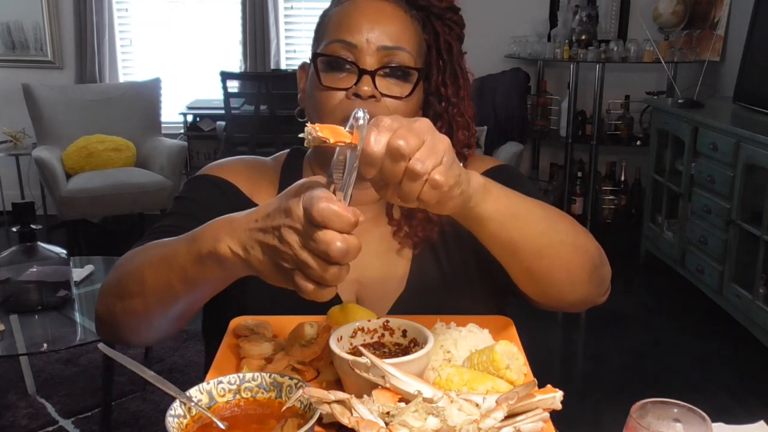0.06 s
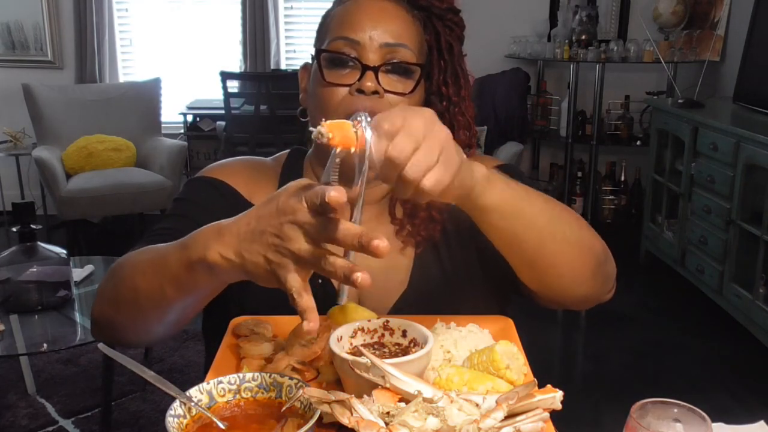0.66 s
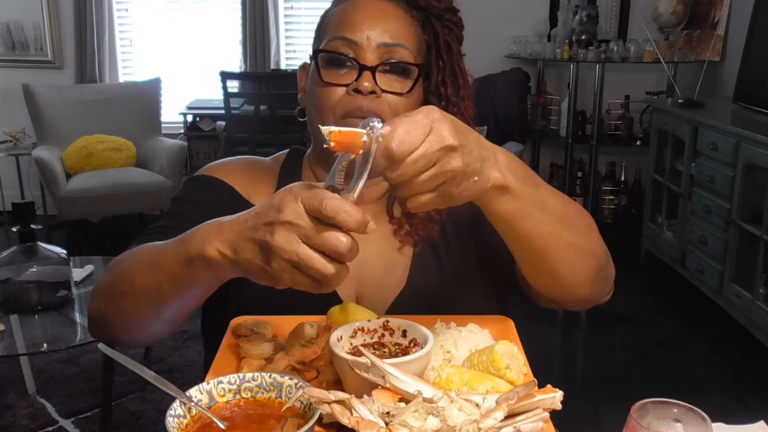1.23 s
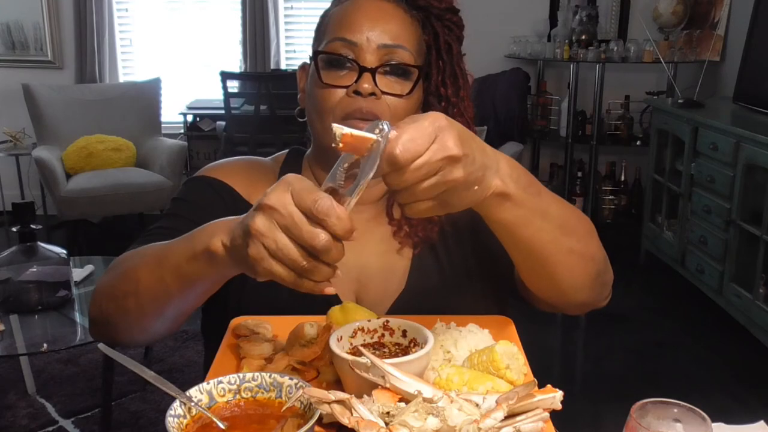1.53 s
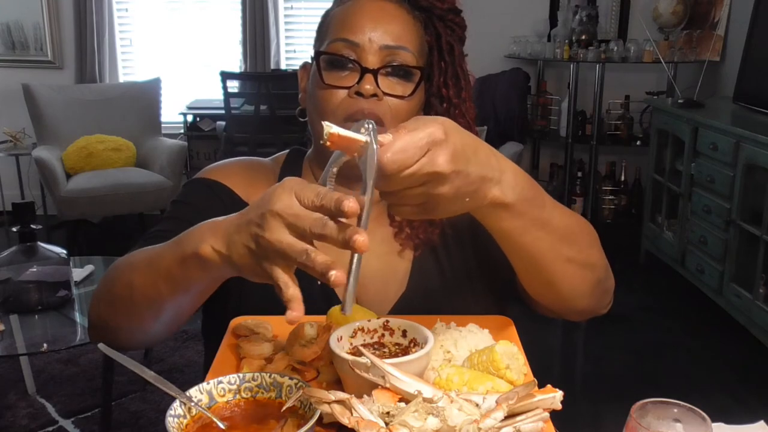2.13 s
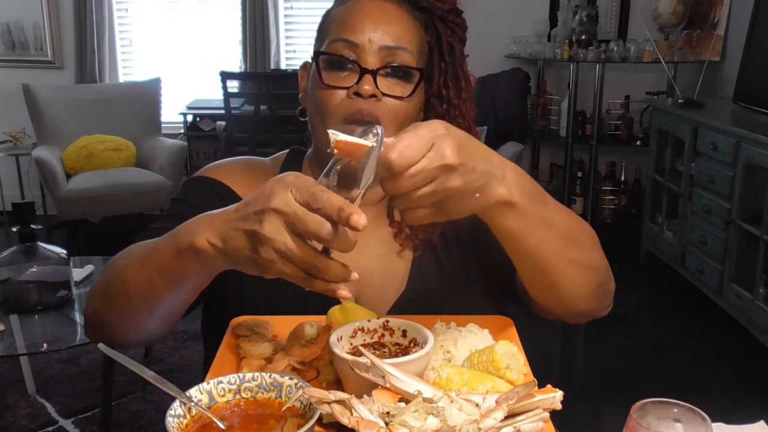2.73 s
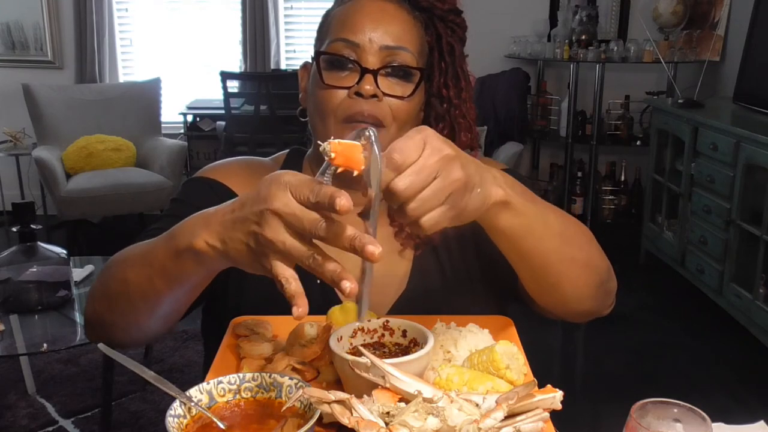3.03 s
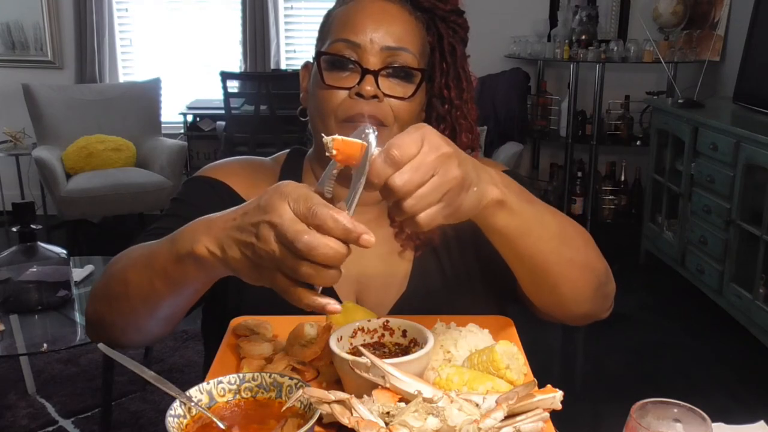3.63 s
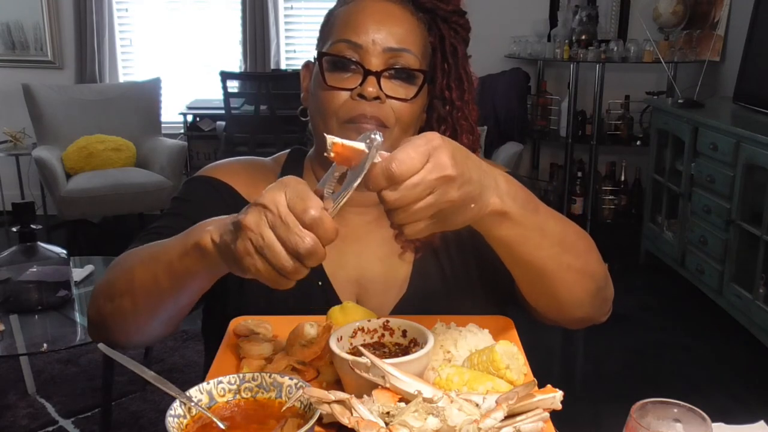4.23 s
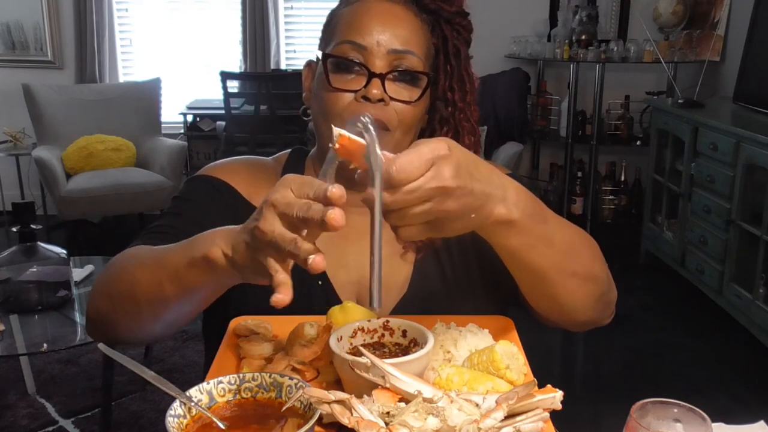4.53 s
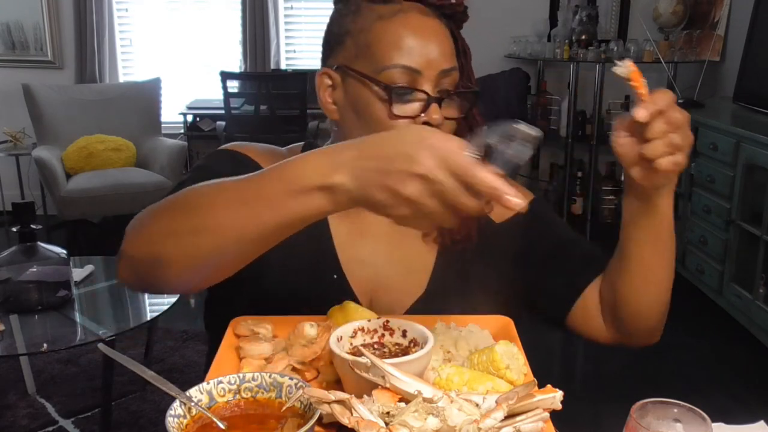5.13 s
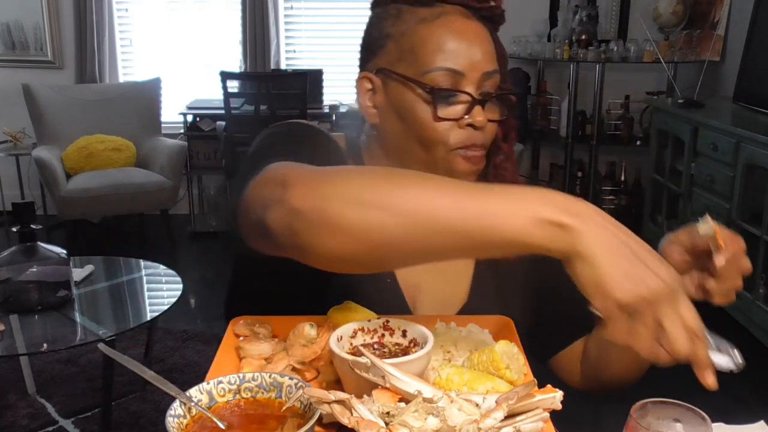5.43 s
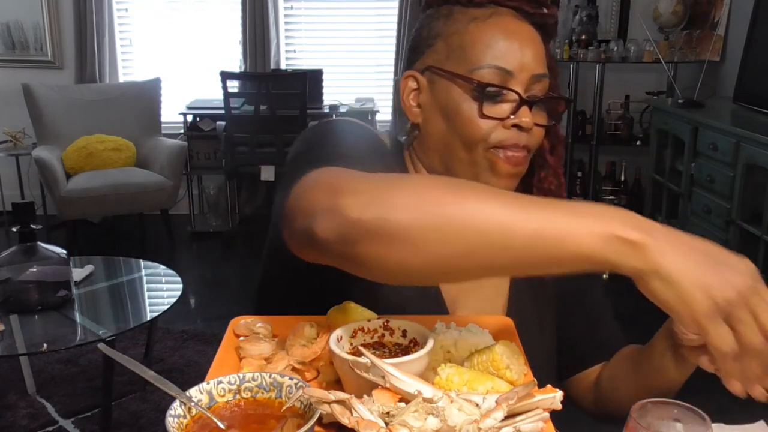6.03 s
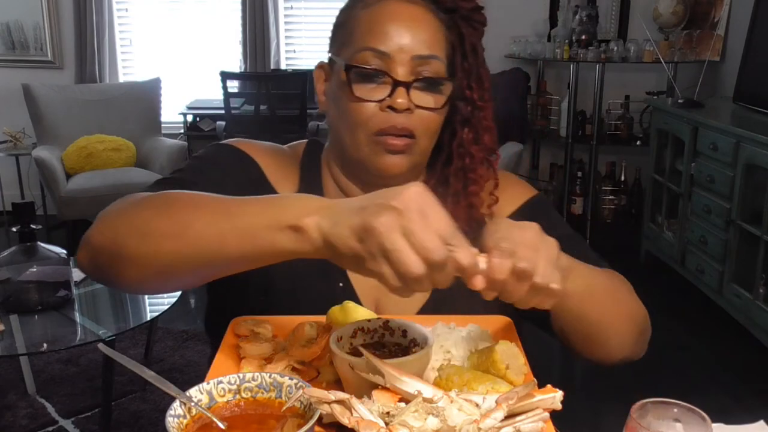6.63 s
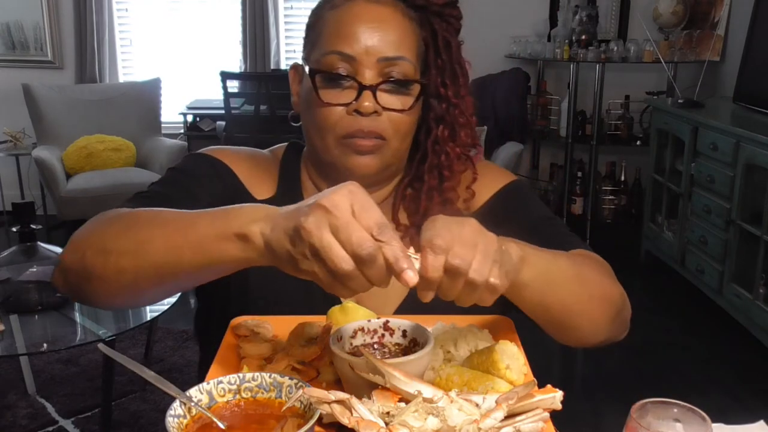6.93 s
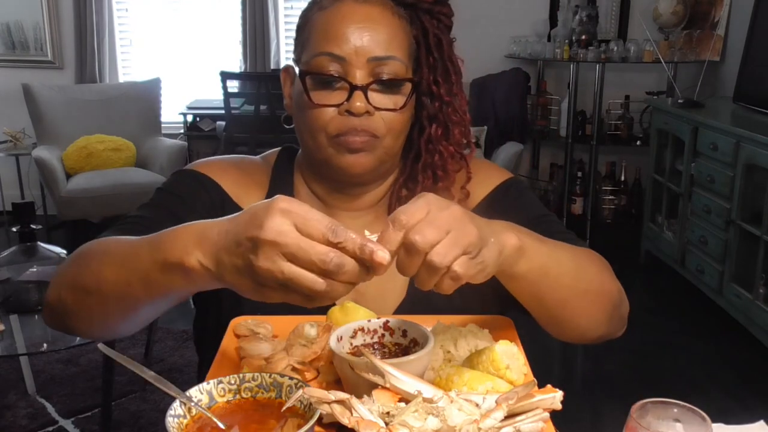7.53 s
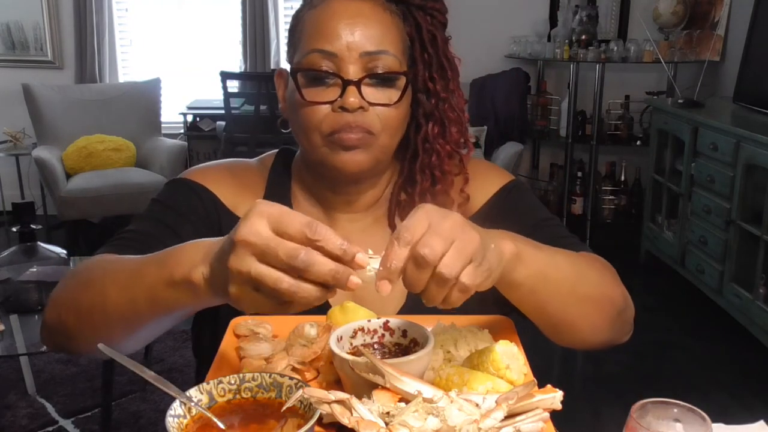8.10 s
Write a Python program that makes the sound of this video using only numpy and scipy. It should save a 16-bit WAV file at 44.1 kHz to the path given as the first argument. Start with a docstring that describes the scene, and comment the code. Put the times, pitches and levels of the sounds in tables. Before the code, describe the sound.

Crab shell breaks in a metal cracker close to the microphone, opening with a quick burst of sharp, bright snaps. Faint rasps, ticks and dull slips follow as the hollow leg shifts in the jaws, with another sharp snap at about 1.6 seconds and a smaller one near 2.2. Around 4 seconds comes a dense, loud run of cracks, trailing into soft rubbing and clicks. Near 6 seconds the cracker is put down slightly to the right with a clack and a brief ringing clatter. Fingers break the shell with a loud snap at 6.8 seconds and more cracks around 7.3. Just after 8 seconds the meat comes loose with a tiny soft plop. A faint motor hum and dull rush of room air continue throughout, dipping briefly after loud cracks. The living room adds a short echo.

```python
"""Sharp snaps and crackles come first: a crab leg is squeezed in a metal cracker over a food tray.
The hollow shell rubs, slips and breaks, close by in a living room. Near 6 s the cracker is put down
with a ringing clatter. Fingers then break the shell further, and the meat comes loose with a soft plop.
A motor hums faintly throughout, and an automatic gain control dips the level after each loud crack."""
import sys
import numpy as np
from scipy import signal
from scipy.fft import rfft, irfft
from scipy.io import wavfile
from scipy.ndimage import uniform_filter1d

SR = 44100
rng = np.random.default_rng(int(sys.argv[2]) if len(sys.argv) > 2 else 0)


def waveform_to_disk(signal):
    """Save audio, clipped to [-1, 1], as 16-bit WAV at the path in sys.argv[1]."""
    frames = np.transpose(np.atleast_2d(signal))
    scaled = np.clip(frames, -1, 1) * 32767
    samples = np.round(scaled).astype(np.int16)
    wavfile.write(sys.argv[1], SR, samples)


N = 364266


def from_db(db):
    """Turn decibels into a number to multiply a sound by."""
    return 10 ** (np.asarray(db) / 20)


def rms_one(x):
    """Scale a sound to an average power of one."""
    return x / np.sqrt(np.mean(x ** 2) + 1e-20)


def unit_energy(x):
    """Scale each channel to a total energy of one."""
    return x / np.sqrt(np.sum(x ** 2, axis=-1, keepdims=True) + 1e-20)


def band(x, low_hz, high_hz, order=2):
    """Keep the part of a sound between two pitches."""
    sos = signal.butter(order, [low_hz, min(high_hz, .48 * SR)], "band", fs=SR, output="sos")
    return signal.sosfilt(sos, x)


def at_hz(points, hz, column=1):
    """Read a table at any pitch, sliding between its rows."""
    points = np.array(points)
    return np.interp(np.log(hz + 1e-9), np.log(points[:, 0]), points[:, column])


def add(out, start_s, sound):
    """Mix a short sound in at the given time."""
    start = max(0, round(start_s * SR))
    out[:, start:start + sound.shape[1]] += sound[:, :N - start]


def stereo_noise(size, side_db):
    """Hiss for two ears; side_db sets how much left and right differ."""
    mid, side = rng.standard_normal((2, size))
    return mid + from_db(side_db) * side * np.array([[1], [-1]])


def ticks(size, per_s, spread_db):
    """Tiny contacts at random moments, of uneven strength."""
    chance, sign = rng.random((2, size))
    strength = from_db(spread_db * np.minimum(rng.exponential(1, size), 3))
    return (chance < per_s / SR) * np.sign(sign - .5) * strength


def click_with(spectrum, size=2048):
    """The shortest click with the tone given by rows of pitch_hz, level_db."""
    hz = np.arange(size // 2 + 1) * SR / size
    cepstrum = irfft(np.log(from_db(at_hz(spectrum, hz))))
    cepstrum[1:size // 2] *= 2  # this line and the next pack the energy at the start
    cepstrum[size // 2 + 1:] = 0
    return irfft(np.exp(rfft(cepstrum)))


def fracture(click, tear_ms, side_db=-11):
    """Spread a click into a sudden break and a dying run of tiny cracks."""
    ms = 1e3 * np.arange(1024) / SR
    tear = unit_energy(stereo_noise(len(ms), side_db) * np.exp(-ms / tear_ms))
    tear[:, 0] += .61 * np.exp(-2 * tear_ms)  # the quicker the break, the harder its first spike
    return np.linalg.norm(click) * unit_energy(signal.fftconvolve(tear, click[None], axes=1))


def struck(tones, scatter_db, phase_spread):
    """A blow starts tones, out of step in each ear; each fades by 60 dB in its ring_s."""
    t = np.arange(SR // 5) / SR
    out = np.zeros((2, len(t)))
    for hz, db, ring_s in tones:
        phase = np.pi * rng.integers(0, 2) + phase_spread * rng.standard_normal((2, 1))
        fade = from_db(db + scatter_db * rng.standard_normal() - 60 * t / ring_s)
        out += fade * np.sin(2 * np.pi * hz * t + phase)
    return out


def room_air(level_db=-53.5):
    """The air in the room makes a dull, steady rush."""
    # tone of the rush: pitch_hz, relative_db, side_db
    air_tone = [(25, -27, -12.5), (60, -12, -11), (98.2, -8, -4.5), (139.2, -0.5, -8.5), (338, 5, -12.5),
                (510, -2, -6.5), (910, -11.5, -5), (1260, -15, -1), (1630, -25.5, -2), (3266, -31, -1),
                (6220, -33.5, -1), (8000, -29.5, -1), (12250, -29.5, 1), (16000, -36, 1.5)]
    hz = np.arange(N // 2 + 1) * SR / N
    mid, side = rfft(rng.standard_normal((2, N))) * from_db(at_hz(air_tone, hz))
    side *= from_db(at_hz(air_tone, hz, column=2))
    return from_db(level_db) * rms_one(irfft(mid + side * np.array([[1], [-1]]), N))


def motor_hum(drift=.003):
    """A motor hums; its tones drift together as its speed wanders."""
    # tones of the motor: pitch_hz, level_db
    hum_tones = [(118.8, -58.5), (178.2, -66.5), (237.6, -73.5), (297, -62.5), (415.8, -80), (594, -71.5),
                 (653.4, -68.5), (712.8, -85.5), (891, -76)]
    speed = 1 + drift * np.interp(np.arange(N) / SR, np.arange(10), rng.standard_normal(10))
    motor_s = np.cumsum(speed) / SR
    return sum(from_db(db) * np.sqrt(2) * np.sin(2 * np.pi * (hz * motor_s + rng.random()))
               for hz, db in hum_tones)


def room_echo(x, build_s=.0012):
    """The room's echo builds quickly, then dies at its own rate in each pitch range."""
    # the echo: pitch_hz, level_db, ring_s (time to fade by 60 dB), side_db
    echo_bands = [(146.7, 0, 0.3, -3.5), (900, -2.5, 0.85, -4.5), (1484, -1, 0.52, -5.5),
                  (2480, -1.5, 0.47, -5.5), (4470, -2, 0.5, -4), (8300, -4.5, 0.48, -1.5),
                  (10800, -8.5, 0.42, 2), (15060, -3.5, 0.3, -0.5)]
    t, edges = np.arange(SR) / SR, np.geomspace(100, 18000, 14)
    response = 0
    for low, high in zip(edges, edges[1:]):
        hz = np.sqrt(low * high)
        level_db, ring_s, side_db = (at_hz(echo_bands, hz, column) for column in (1, 2, 3))
        envelope = from_db(-60 * t / ring_s) * (1 - np.exp(-t / build_s))
        tail = unit_energy(band(stereo_noise(len(t), side_db), low, high, order=3) * envelope)
        response += from_db(level_db) * np.sqrt(2 * (high - low) / SR) * tail
    return signal.fftconvolve(x.mean(axis=0, keepdims=True), response, axes=1)[:, :N]


def meat_plops():
    """Small wet pockets pop open and ring briefly as the meat comes loose."""
    # the plops: start_s, pitch_hz, level_db, ring_s
    plops = [(8.1397, 1133, -45.5, 0.042), (8.143, 840, -45.5, 0.047)]
    out = np.zeros((2, N))
    for start_s, hz, db, ring_s in plops:
        add(out, start_s, struck([(hz, db, ring_s)], scatter_db=4, phase_spread=.23))
    return out


def shell_rubbing(attack_s=.0064, release_s=.0057, width_hz=1400):
    """Rough shell slides under pressure: tiny slips rasp in the hollow leg, with bright ticks on top."""
    # squeezes and twists: start_s, length_s, relative_db, rasp_hz, ticks_db (compared with the rasp)
    squeezes = [(0, 0.0022, -34, 3950, 8), (0.057, .034, -40, 4140, 7), (.431, 0.042, -57, 3700, -1.5),
                (.54, 0.036, -58.5, 4070, -2), (0.687, 0.067, -61, 3670, -3), (1.492, .057, -62.5, 4160, 0),
                (2.003, 0.042, -72, 3500, 3), (2.502, 0.05, -64, 3900, -5.5), (2.748, .05, -69, 3630, -1),
                (3.182, .017, -52, 3800, -7), (3.492, 0.083, -63, 3500, -8), (4.165, .04, -59, 4400, -3),
                (4.447, 0.024, -50.5, 4200, 0), (4.612, 0.1, -53, 4100, -9), (4.767, 0.018, -54, 3830, 1.5),
                (5.5, .037, -65, 3200, -3), (6.481, 0.085, -72, 3390, -10), (7.267, 0.043, -60, 3180, 0),
                (7.504, 0.044, -63, 4000, -6), (7.875, .097, -80, 3700, -3)]
    out, t = np.zeros((2, N)), np.arange(SR // 4) / SR
    for start_s, length_s, db, rasp_hz, ticks_db in squeezes:
        pressure = np.clip(t / attack_s, 0, 1) * np.exp(-np.maximum(t - length_s, 0) / release_s)
        grit = ticks(len(t), per_s=760, spread_db=-.5) * stereo_noise(len(t), side_db=-5.5)
        rasp = rms_one(band(grit, rasp_hz - width_hz / 2, rasp_hz + width_hz / 2))
        grains = rms_one(band(ticks(len(t), per_s=350, spread_db=1), 5700, 11000))
        add(out, start_s, from_db(db - 6) * pressure * (rasp + from_db(ticks_db) * grains))
    return out


def shell_click(bass_db, body_db, body_hz, wall_db, tilt_db, chip_hz):
    """One break: the hollow leg rings from body_hz up, its stiff wall higher, the loose chip highest."""
    low_db = 5.5 - 10 * np.log10(1 + from_db(tilt_db) ** 2)
    high_db = low_db + tilt_db  # tilt_db leans the treble toward its high end
    knock = [(40, bass_db + .5), (120, bass_db + 9), (300, bass_db + 16),
             (700, bass_db + 7.5), (1200, bass_db + 10.5), (1700, bass_db + 4.5)]
    body = [(.82 * body_hz, min(bass_db + 12, body_db - 2.5)), (body_hz, body_db),
            (4250, (body_db + wall_db) / 2)]
    wall = [(4800, wall_db), (5400, wall_db - 3), (6200, min(wall_db, low_db - 7.5))]
    treble = [(7700, low_db - .23 * tilt_db), (9500, low_db + .5 * tilt_db + .29), (11000, high_db - .3),
              (13000, high_db - 5), (14500, high_db - 8.5), (15500, high_db - 17.5)]
    click = click_with(sorted(knock + body + wall + treble))
    chip_ring = band(click, chip_hz - 500, chip_hz + 500, order=1)
    return click + from_db(-4) * chip_ring


def shell_crumbs(crumbs_per_s=9.3, crumb_db=-46):
    """Small bright chips flake off, each with its own tone; finer crumbs fall at random."""
    # chips under the fingers: start_s, relative_db
    chips = [(.61, -36.5), (1.392, -40), (1.511, -26.5), (1.534, -33), (1.564, -34), (1.986, -39),
             (2.029, -40), (2.045, -38), (2.13, -36.5), (2.369, -38), (2.773, -36), (2.849, -36.5),
             (2.965, -38.5), (4.731, -32), (4.997, -38), (5.281, -37), (6.721, -27), (7.007, -28),
             (7.196, -41), (7.296, -23), (7.81, -46.5), (7.905, -40), (8.24, -42)]
    out = np.zeros((2, N))
    draws = rng.random((int(crumbs_per_s * N / SR), 2))
    crumbs = [(when * (N - 1) / SR, crumb_db + size - .5) for when, size in draws]
    for start_s, db in chips + crumbs:
        click = shell_click(bass_db=-14.5, body_db=-8, body_hz=3100, wall_db=-8.5,
                            tilt_db=rng.normal(0, 3), chip_hz=rng.uniform(7500, 12000))
        add(out, start_s, from_db(db) * fracture(click, tear_ms=.9))
    return out


def hinge_rattle(fade_s=.0062):
    """The hinge and toothed jaws chatter after a blow, metal on metal."""
    # tone of the chatter: pitch_hz, relative_db
    rattle_tone = [(100, -29), (1500, -24), (2200, -17), (2900, -26.5), (4400, -13.5), (5300, -14),
                   (6100, -4.5), (7300, 0.5), (8100, -3.5), (9500, 2), (10900, 0), (12000, -10.5),
                   (14500, -10.5), (16000, -23.5)]
    t = np.arange(SR // 5) / SR
    contacts = ticks(len(t), per_s=900, spread_db=.5) * np.exp(-t / fade_s)
    chatter = contacts * stereo_noise(len(t), side_db=-14.5)
    return unit_energy(signal.fftconvolve(chatter, click_with(rattle_tone)[None], axes=1))


def cracker_landing(split_hz=63.5):
    """The cracker lands, tips and settles: it clacks, its arms ring and the table thuds."""
    # blows, with relative levels: start_s, ring_db, slope_db_per_octave, thud_db, clack_db
    landings = [(5.9006, -15, 0, -28.5, 3.5), (5.9193, -25.5, 5, -40.5, -10), (5.9553, -36, 0, -39, -16),
                (5.969, -16.5, -1, -55.5, 20), (6.0803, -29, -3.5, -52, -19),
                (6.0833, -24.5, 4, -47.5, -19)]
    # tones of the metal arms: pitch_hz, relative_db, ring_s
    arm_tones = [(4450, -18, .07), (5750, -14.5, 0.11), (6115, -12.5, .22), (7047, -5.5, 0.18),
                 (7413, -7, .17), (7600, -14, .08), (8651, 0, .11), (8893, -8, .1), (9415, -9, .13),
                 (9600, -8, 0.14), (9781, -7.5, .18), (9880, -7.5, 0.11), (10400, 2.5, .14),
                 (10750, -4.5, .14), (10920, -4.5, .14), (11080, -21, .12), (11750, -13, .1),
                 (12380, -17.5, .1), (13420, -10.5, .15), (14560, -13, .14)]
    # tones of the table and its dishes: pitch_hz, relative_db, ring_s
    table_tones = [(140, -6.5, 0.092), (200, -4.5, .072), (268, 4.5, .06), (315, -8.5, .08),
                   (373, 1.5, .12), (500, -4.5, .078), (560, -7.5, .1), (655, 0.5, .13), (776, 2, .11),
                   (860, -4.5, 0.12), (958, 0, .12), (1050, -8.5, 0.095), (1110, -6, .12), (1270, -10, .1),
                   (1375, -6.5, .08), (1637, -23, .1), (2110, -15.5, .1), (2347, -14, .08),
                   (3252, -18.5, 0.09), (3350, -5.5, 0.11), (3460, -5.5, 0.12), (3610, -5.5, 0.099),
                   (3747, -9, .09)]
    # the clack of metal on the table: pitch_hz, relative_db
    clack_tone = [(60, -15), (200, -8), (700, -8), (1300, -15), (2200, -10), (3500, -29.5), (4700, -3.5),
                  (6000, -13), (7200, 8), (9000, -2), (11000, 0), (13000, -19), (15500, -24)]
    knock_tone = [(885, 18.5, .007)]  # the table top gives under the blow
    clack, metal, thud = np.zeros((3, 2, N))
    t = np.arange(SR // 4) / SR
    for start_s, ring_db, slope_db, thud_db, clack_db in landings:
        arms = [(hz, db + slope_db * np.log2(hz / 9000), ring_s) for hz, db, ring_s in arm_tones]
        # the loose hinge adds four shorter tones around each one
        neighbours = [(hz + split_hz * (k + rng.random() - .5), db, ring_s * .32)
                      for hz, db, ring_s in arms for k in (-2, -1, 1, 2)]
        contact = fracture(click_with(clack_tone), tear_ms=.85, side_db=-5.5)
        add(clack, start_s, from_db(clack_db) * contact)
        ring = struck(arms + neighbours, scatter_db=3.5, phase_spread=1)
        add(metal, start_s, from_db(ring_db - 10) * ring)
        add(metal, start_s, from_db(ring_db + 18.5) * hinge_rattle())
        clatter = struck(table_tones, scatter_db=2, phase_spread=.089)
        knock = struck(knock_tone, scatter_db=2.5, phase_spread=.27)
        add(thud, start_s, from_db(thud_db) * (clatter + knock))
        burst = np.exp(-t / .0065) * stereo_noise(len(t), side_db=-6.5)
        add(thud, start_s, from_db(thud_db + 14.5) * band(burst, 170, 1350, order=3))
    clack *= from_db([[-3], [3]])  # toward the right
    return clack, metal, band(thud, 86, 9000)  # the thud carries no deep bass


def splinters(click, count=5):
    """A break sheds a few small after-cracks as the load shifts."""
    out = np.zeros((2, SR // 16))
    for delay_s, db in zip(rng.exponential(.0045, count), rng.normal(-15, 2.5, count)):
        add(out, min(delay_s, .03), from_db(db) * fracture(click, tear_ms=.3)[:, :256])
    return out


def shell_breaks():
    """The shell gives way in short, bright snaps and in dull, woody slips in the jaws."""
    # snaps: start_s, treble_db, bass_db, body_db, body_hz, wall_db, tilt_db, room_db, chip_hz
    # (treble_db is a relative level; bass, body and wall are compared with it)
    snaps = [(0.0093, -19, -21.5, -4.5, 3300, -2, 4, 17.5, 9500),
             (0.0423, 12, -18.5, -16, 3300, -12, 2.5, -4, 9000),
             (0.0915, 9.5, -30, -19.5, 3400, -8.5, 0.5, 0.5, 9000),
             (0.1056, -0.5, -23.5, -3.5, 3300, 0, 4, 8, 8000),
             (.832, -21.5, -30.5, -5, 3100, -5, 8, -1, 11500),
             (1.259, -26.5, -34.5, -2, 3100, -3, 3.5, 1, 9500),
             (1.446, -29.5, -12, -3, 3000, -6, -1, 8, 8000),
             (1.582, -15, -19, -11, 3000, -15, 6, 6.5, 12500),
             (1.634, 4, -21.5, -9.5, 3600, -3.5, 0, -0.5, 7500),
             (2.1694, -21.5, -24, -2.5, 2900, -9, -3, 2, 8200),
             (2.2454, -10.5, -17.5, 0, 2900, -8, 3, 3, 8700),
             (2.2475, -21.5, -23, -2, 2320, 1, 5, -3, 12800), (2.672, -23, -37, 4, 3100, 0, -3, 2, 8000),
             (3.854, -30.5, -29.5, -7.5, 3100, -2.5, 2, 4, 9000),
             (3.953, -32.5, -17, 4.5, 3700, 3.5, -7, 5.5, 8000),
             (3.9754, -16, -19.5, -2.5, 3700, 4, -1, 2, 9500),
             (4.0155, 3.5, -20.5, 1, 3100, 6, -4.5, 1, 7600),
             (4.0626, 8, -24, -4, 3305, -1.5, 0, 3.5, 9200),
             (4.0707, -1, -23.5, -13.5, 3300, -12.5, -3, -6.5, 9800),
             (4.0788, -10, -26, -10.5, 3700, -4, 8.5, 0.5, 10500),
             (4.096, -2.5, -30.5, -19.5, 3700, -20, 3, 5, 9500),
             (4.1, -6, -36, -16.5, 3700, -14, 0.5, -3, 10000),
             (4.1124, 6.5, -30, -6, 3200, -9.5, 1, -1, 11800),
             (4.1611, -4.5, -22.5, 0, 3800, -3, 2.5, 11.5, 12000),
             (4.17, -2.5, -42.5, -1, 4000, 7, 11.5, -8, 11000),
             (4.186, 6.5, -27.5, -4, 3950, 1.5, 0.5, 8, 10500),
             (4.188, 3, -26.5, 3.5, 3950, 4, 6, -3, 9700), (4.1916, 2.5, -16.5, 5, 3700, 7, -1, -12, 10300),
             (4.1955, 0.5, -24.5, 4, 3000, -2, 4.5, -6.5, 11000),
             (4.1968, 4, -18, -2, 2300, -1.5, -5, 1.5, 9700), (4.383, -16, -47, 6, 3800, 7, -5, 0, 11000),
             (4.565, -24, -18, -11, 3100, 0, 1, 7, 10500), (6.691, -16, -20, -6, 2400, -4, -3, 2, 8300),
             (6.7997, 10.5, -24.5, -5.5, 2480, 0, 1.5, 3, 8700),
             (7.2391, -22, -18, -7.5, 2900, -5.5, 2.5, 17.5, 8200),
             (7.248, 0.5, -34.5, -22, 3400, -11.5, -10.5, -8, 7600),
             (7.3305, -22, -15, 1.5, 2700, -1, -3, 5.5, 8500),
             (7.3379, -12, -37, -15, 2800, -7, -2, -13, 7900), (7.347, -21, -26, -13, 2800, 1, 1, 5, 8200)]
    # slips: start_s, relative_db, treble_db (compared with the body)
    slips = [(0.549, -37.5, 3.5), (0.777, -34.5, -0.5), (0.787, -35, 0.5), (2.7871, -35.5, -16),
             (3.193, -31.5, -10), (3.6036, -39, 3), (3.64, -49, 11.5), (4.4806, -34.5, -2.5),
             (4.625, -31.5, 9), (4.6507, -32, -12), (4.7031, -35.5, -9), (4.756, -35.5, -3.5),
             (5.212, -39.5, 0.5)]
    for start_s, db, bass_db, body_db, body_hz, wall_db, tilt_db, room_db, chip_hz in snaps:
        click = shell_click(bass_db, body_db, body_hz, wall_db, tilt_db, chip_hz)
        tear_ms = .5
        yield start_s, from_db(db - 2) * click, tear_ms, room_db
    for start_s, db, treble_db in slips:
        click = shell_click(bass_db=-2.5 - treble_db, body_db=5.5 - treble_db, body_hz=3460,
                            wall_db=3.5 - treble_db, tilt_db=-3, chip_hz=8800)
        tear_ms, room_db = 1.2 * 2 ** (-treble_db / 12), 3  # duller slips drag longer
        yield start_s, from_db(db + treble_db + 4.5) * click, tear_ms, room_db


def shell_cracking():
    """Each break arrives directly, bounces off the tray and table, and spreads into the room."""
    # bounces off the tray and table top: delay_ms, level_db
    bounces = [(1.28, -1.5), (3.1, -13)]
    near, to_room = np.zeros((2, N)), np.zeros((1, N))
    for start_s, click, tear_ms, room_db in shell_breaks():
        add(to_room, start_s, from_db(room_db) * click[None])  # all directions blend to a smooth click
        snap = fracture(click, tear_ms)
        add(near, start_s, snap)
        add(near, start_s, splinters(click))
        for delay_ms, bounce_db in bounces:
            path_ms = delay_ms * (1 + .22 * (rng.random() - .5))  # the hands move a little
            slanted = (snap + fracture(click, tear_ms)) / np.sqrt(2)  # the wave varies with direction
            add(near, start_s + path_ms * 1e-3, from_db(bounce_db) * slanted)
    return near, to_room


def gain_control(x, threshold_db=-28.5, slope=.35, release_db_per_s=16):
    """Look a few milliseconds ahead, turn loud peaks down and recover slowly."""
    power = uniform_filter1d(np.mean(x ** 2, axis=0), size=220)
    level_db = 10 * np.log10(np.maximum(power, 1e-12))
    needed_db = slope * np.maximum(level_db - threshold_db, 0)
    recovery_db = release_db_per_s * np.arange(N) / SR
    cut_db = np.maximum.accumulate(needed_db + recovery_db) - recovery_db
    return x * from_db(-uniform_filter1d(cut_db, size=64))


def scene():
    """Hands and tool close by, the room and its hum behind."""
    snaps, to_room = shell_cracking()
    clack, metal, thud = cracker_landing()
    handling = shell_rubbing() + meat_plops() + shell_crumbs()
    echo = room_echo(to_room + from_db(-.5) * handling + from_db(-14.5) * clack
                     + from_db(7) * metal + from_db(-3) * thud)
    mix = snaps + handling + clack + metal + thud + echo + room_air() + motor_hum()
    return mix * from_db([[-.4], [.4]])  # slightly louder on the right


def record(dry, cutoff_hz=16000):
    """Turn loud cracks down, round their peaks and cut the very highest treble."""
    rounded = .9 * np.tanh(gain_control(dry) / .78)
    return signal.sosfilt(signal.ellip(10, .2, 80, cutoff_hz, fs=SR, output="sos"), rounded)


dry = scene()
out = record(dry)
waveform_to_disk(out)
```